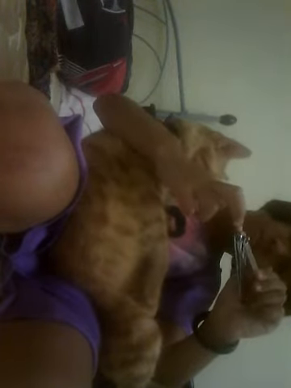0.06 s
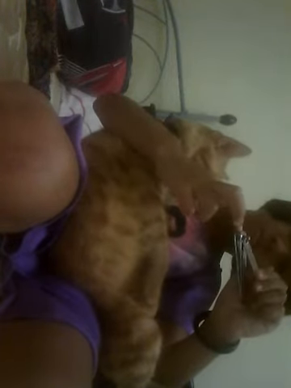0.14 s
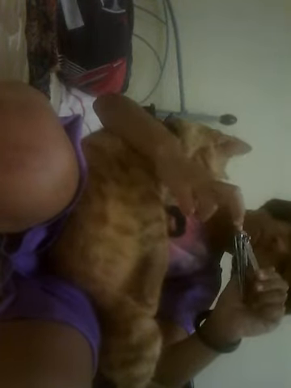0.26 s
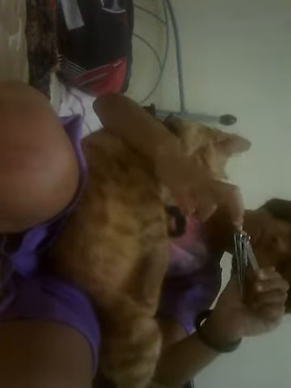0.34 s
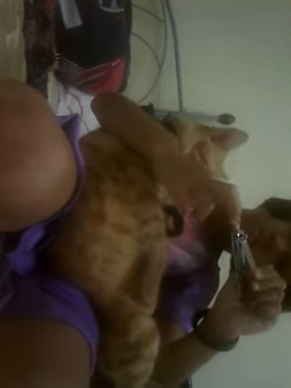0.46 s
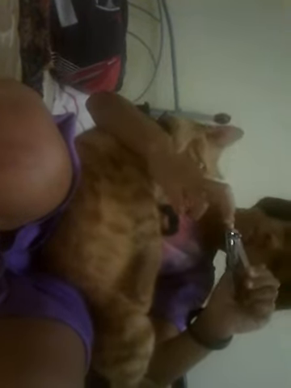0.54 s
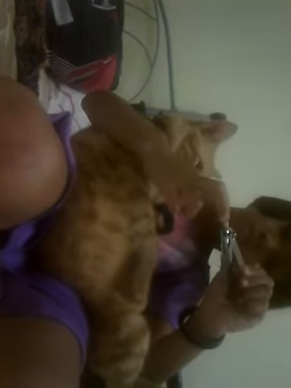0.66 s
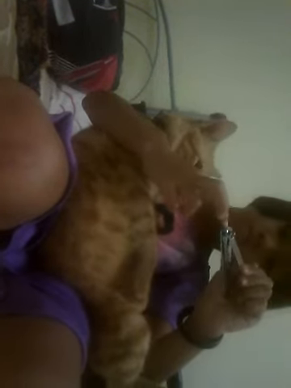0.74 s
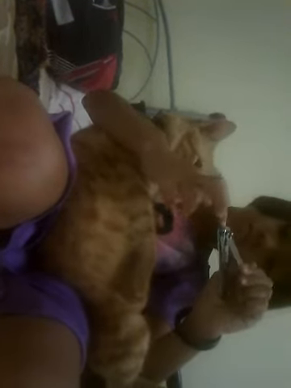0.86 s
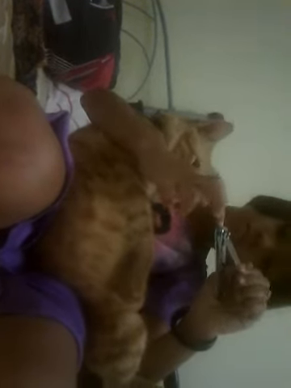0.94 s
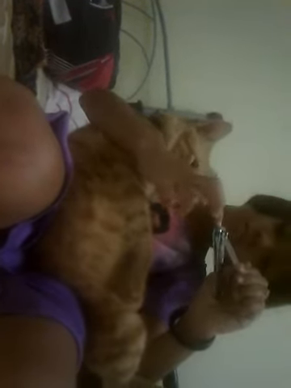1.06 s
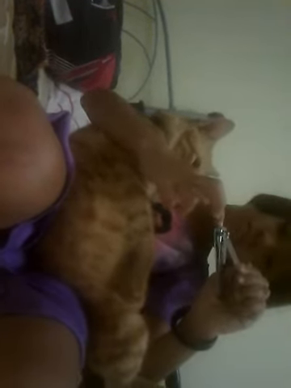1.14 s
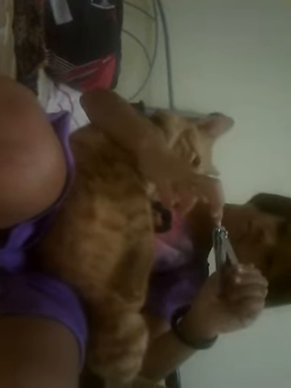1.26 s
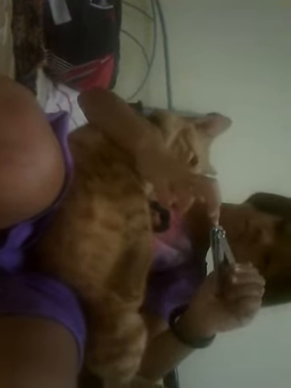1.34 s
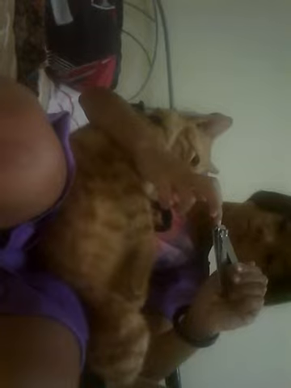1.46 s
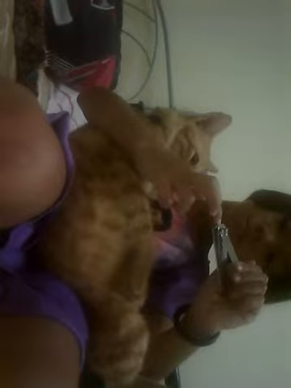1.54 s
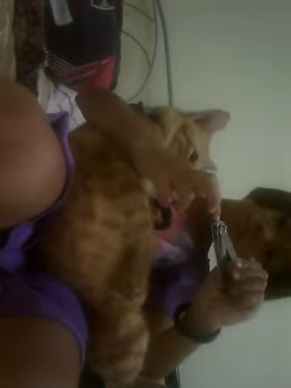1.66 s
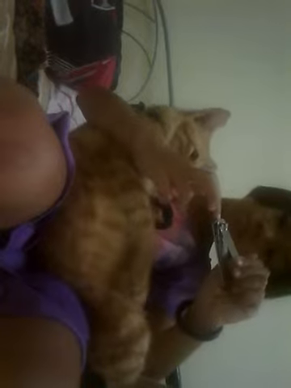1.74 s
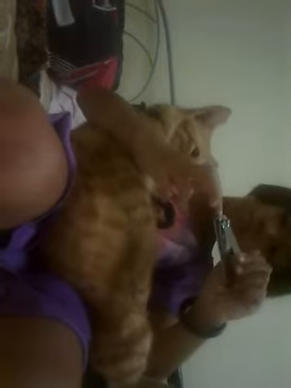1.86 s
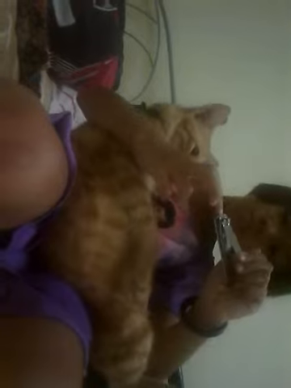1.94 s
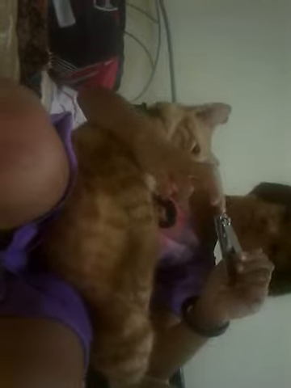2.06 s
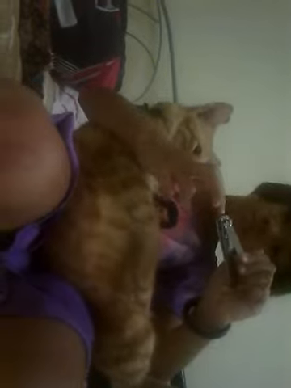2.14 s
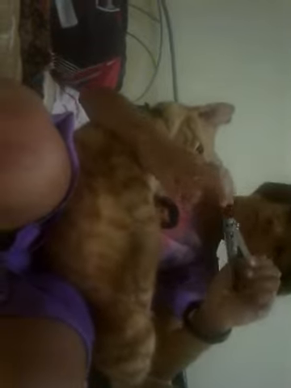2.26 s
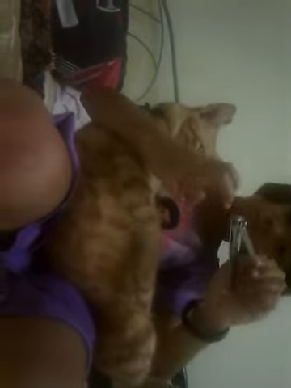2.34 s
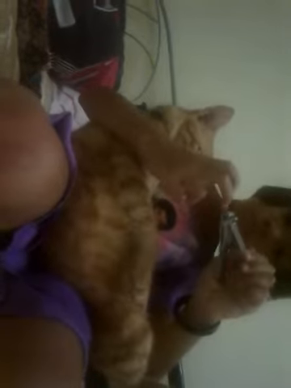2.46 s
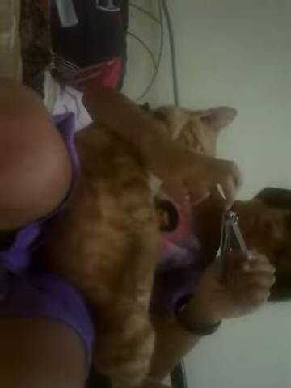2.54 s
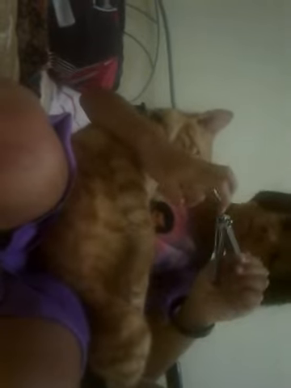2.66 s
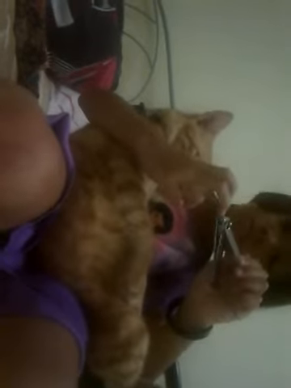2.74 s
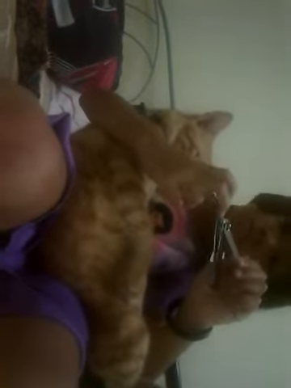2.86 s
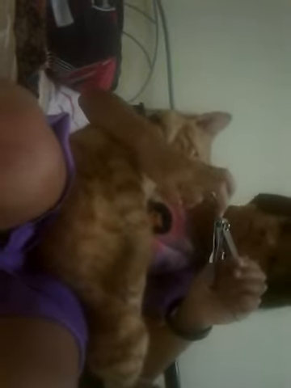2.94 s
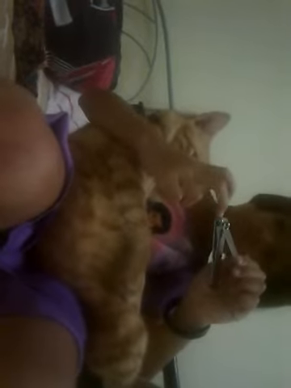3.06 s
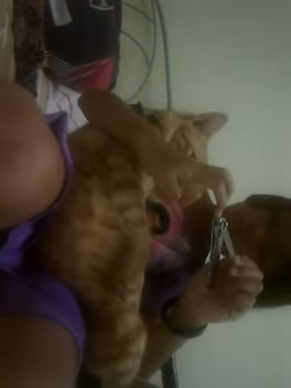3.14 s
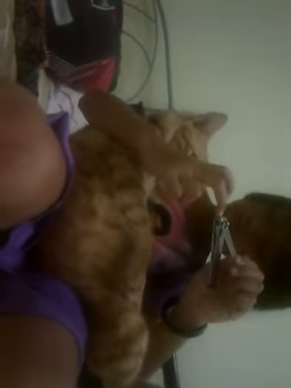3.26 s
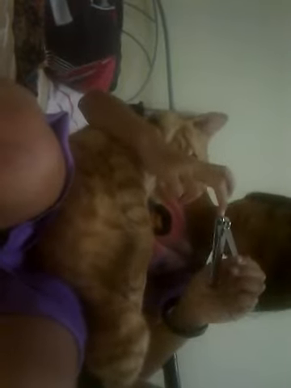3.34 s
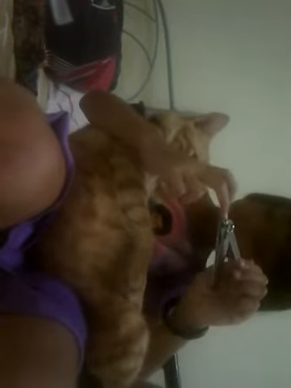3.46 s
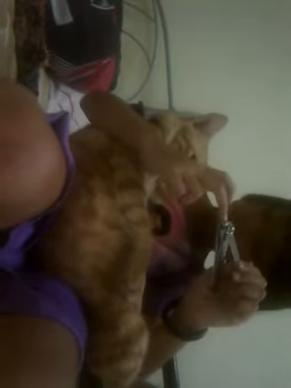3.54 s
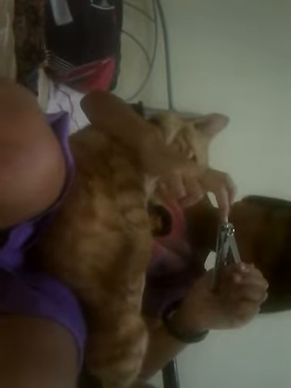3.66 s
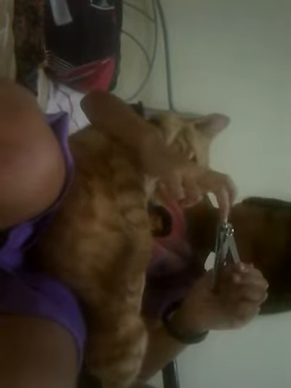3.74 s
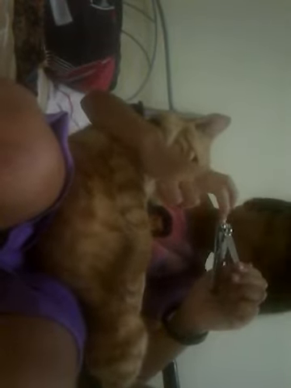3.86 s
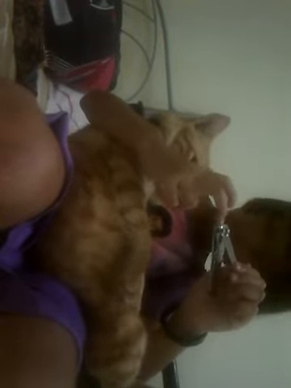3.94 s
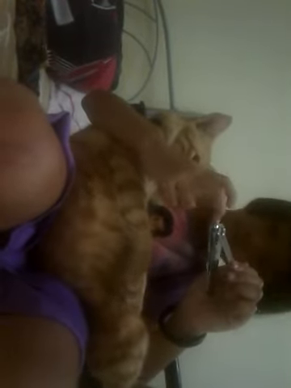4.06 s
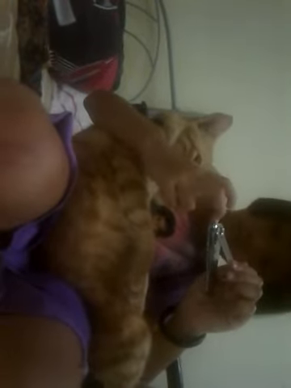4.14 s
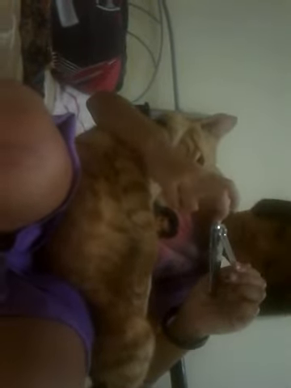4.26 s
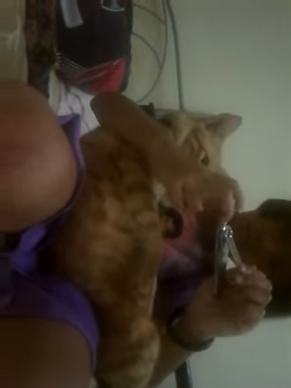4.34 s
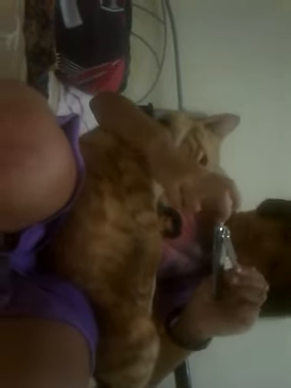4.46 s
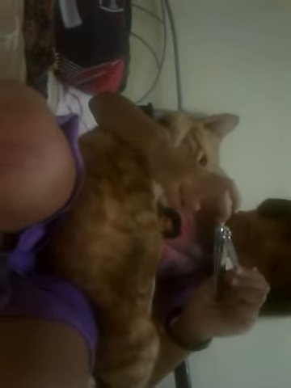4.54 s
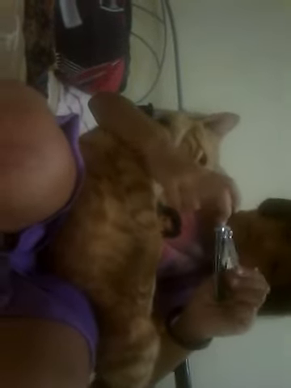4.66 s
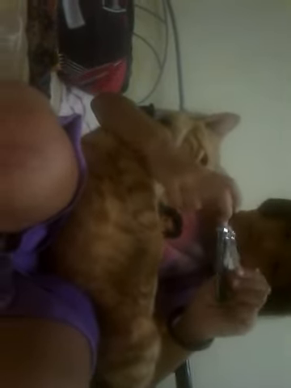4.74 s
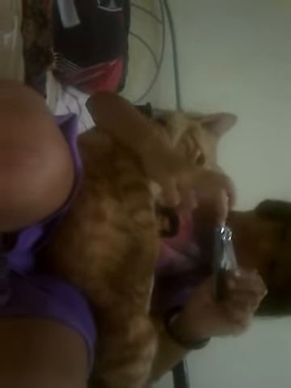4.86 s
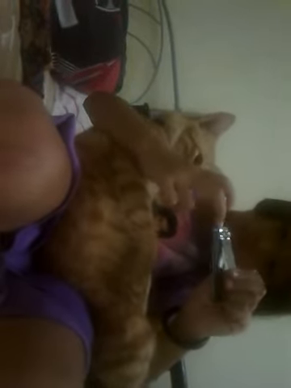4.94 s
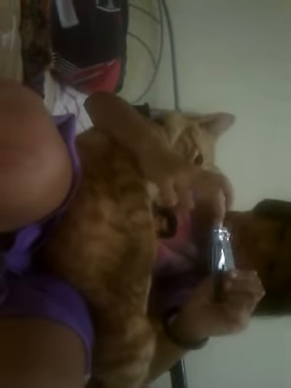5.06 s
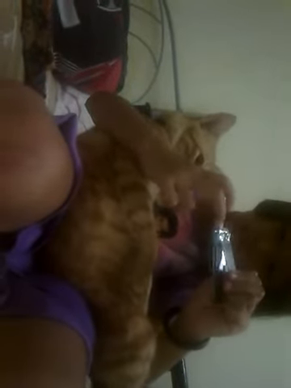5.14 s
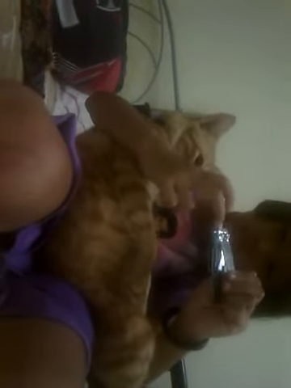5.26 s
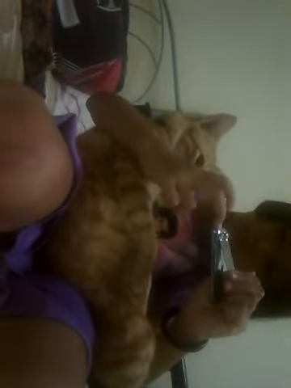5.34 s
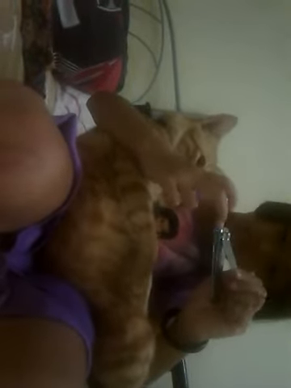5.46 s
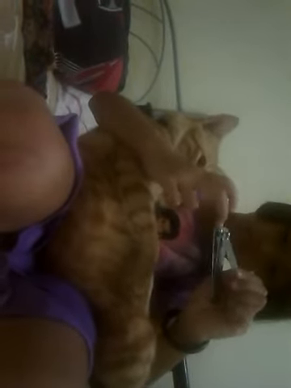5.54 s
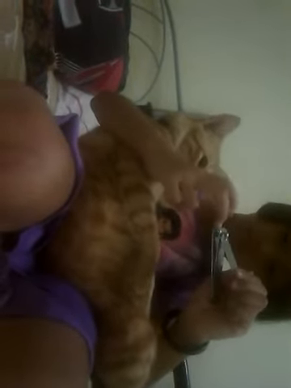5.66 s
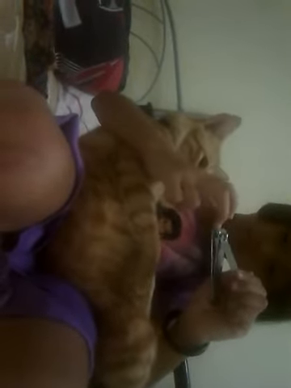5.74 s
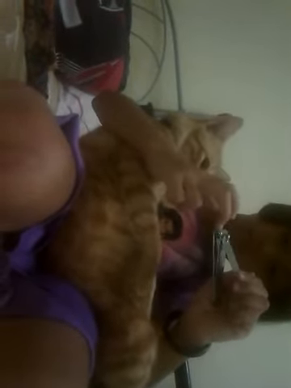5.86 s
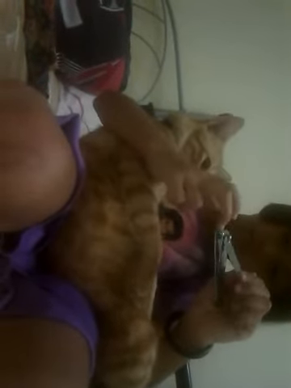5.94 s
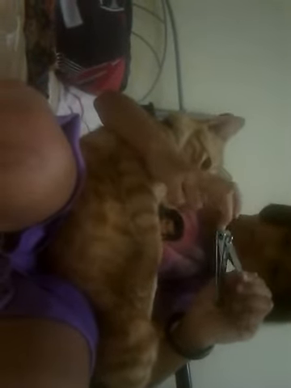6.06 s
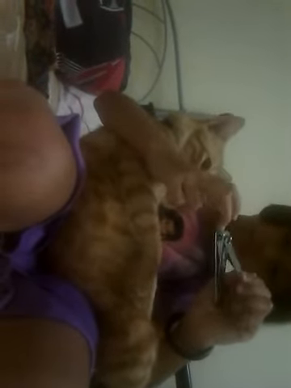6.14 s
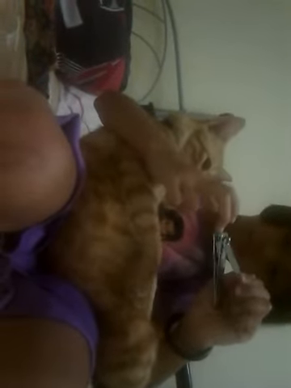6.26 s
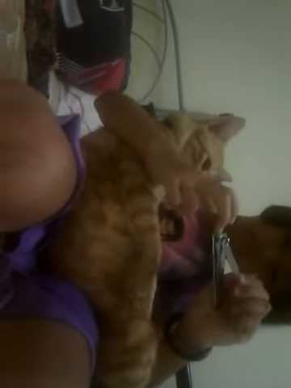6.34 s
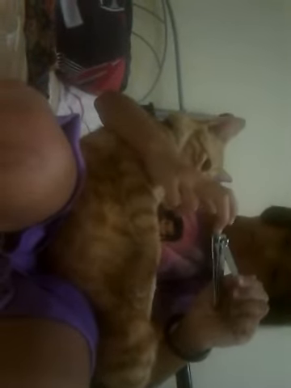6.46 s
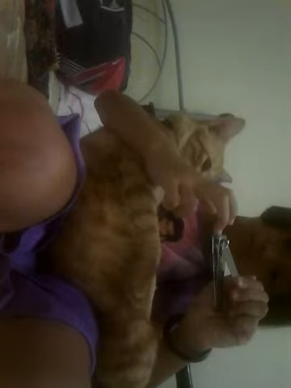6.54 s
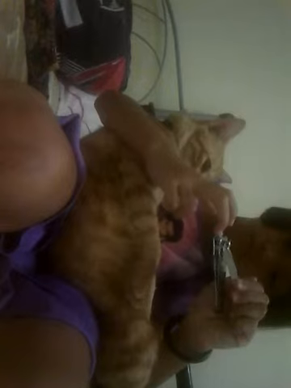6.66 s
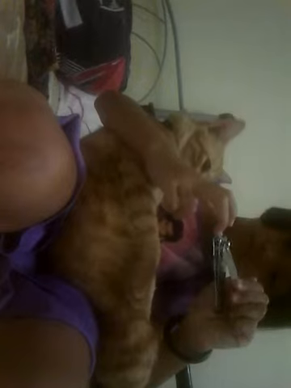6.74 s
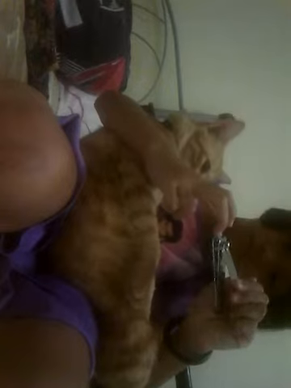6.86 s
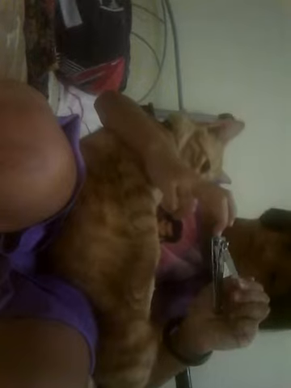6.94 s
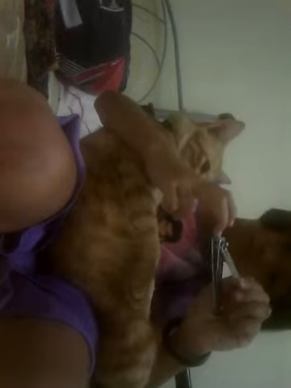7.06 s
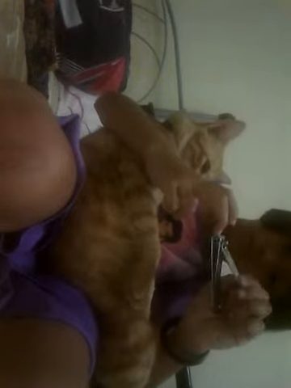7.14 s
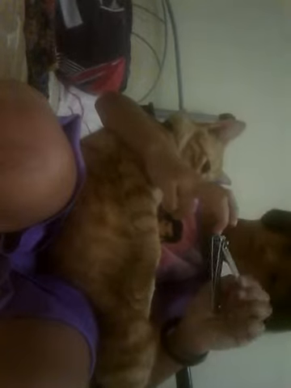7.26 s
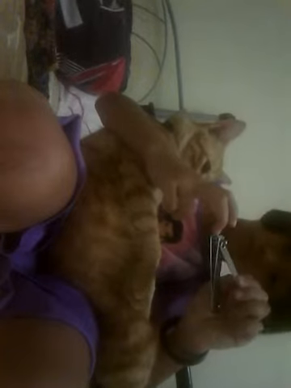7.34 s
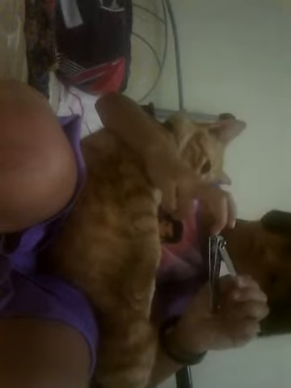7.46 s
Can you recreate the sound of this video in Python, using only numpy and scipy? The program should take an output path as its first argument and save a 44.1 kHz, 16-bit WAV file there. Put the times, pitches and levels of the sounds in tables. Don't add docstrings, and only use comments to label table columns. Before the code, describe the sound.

A nail clipper cuts a cat's claws about a metre from a phone. Faint metallic ticks and brushing fur come first, then a bright snap with quick clattering rebounds. After a quieter stretch, rustles and low bumps build to a second, stronger snap, followed by rattling metal and faint hinge squeaks. Short room echoes are chopped off as the fan's low hum fades in and out.

```python
import sys
import numpy as np
from scipy import signal
from scipy.fft import rfft, irfft
from scipy.io import wavfile
from scipy.ndimage import uniform_filter1d

SR = 44100
rng = np.random.default_rng(int(sys.argv[2]) if len(sys.argv) > 2 else 0)


def store_pcm(level_fs):
    pcm = np.round(np.clip(level_fs, -1, 1) * 32767).astype(np.int16)
    wavfile.write(sys.argv[1], SR, np.atleast_2d(pcm).T)


def volts_from_db(level):
    exponent = np.asarray(level, float) / 20
    return 10 ** exponent


N = 330436
STEP = 32
OPEN_DB = -57.5

# freq_hz, width_hz, level_db
LEVER_MODES = [
    [(2490, 140, 3.5), (3050, 91, -7), (4300, 1760, -5)],
    [(7225, 550, 3), (8500, 1000, 2.5), (9640, 1600, -2), (6160, 1000, -11)],
    [(13250, 600, 2), (12000, 1200, -10), (14400, 1400, -10), (11080, 780, -9), (16000, 2000, -22)],
]
# freq_hz, level_db (per Hz)
RATTLE_ROOM = [(1760, -40.5), (3000, -15.5), (3960, -18.5), (6040, -15.5), (6960, 0), (7690, -5),
               (8750, 0.5), (9900, -5), (11400, -16.5), (12300, -0.5), (13300, 2), (14100, -1.5),
               (16000, -21.5), (16500, -43)]


def ring(x, hz, width_hz):
    r = np.exp(-np.pi * width_hz / SR)
    pole = r * np.exp(2j * np.pi * hz / SR)
    return 2 * (1 - r) ** 2 * signal.lfilter([1], [1, -2 * pole, pole * pole], x).real


def body(x, modes):
    return sum((-1) ** k * volts_from_db(db) * ring(x, hz, width_hz) for k, (hz, width_hz, db) in enumerate(modes))


def unit(x):
    return x / np.sqrt(np.mean(x ** 2))


def colour(x, points):
    hz = np.maximum(np.arange(len(x) // 2 + 1) * SR / len(x), 1)
    points_hz, points_db = np.array(points).T
    gain_db = np.interp(np.log(hz), np.log(points_hz), points_db)
    return irfft(rfft(x) * volts_from_db(gain_db), len(x))


def walk(rate_hz):
    k = int(SR / rate_hz)
    held = np.repeat(rng.standard_normal(N // k + 1), k)
    return 1.3 * uniform_filter1d(uniform_filter1d(held, k), k)[:N]


def clock():
    return np.arange(0, N, STEP) / SR


def smooth(control):
    return np.interp(np.arange(N) / SR, clock(), control)


def room(wash, rings, gap_s, rise_s, size=SR // 3):
    # delay_s, level_db (over the diffuse sound)
    echoes = [(.005, 5.5), (0.0113, 3), (.0165, 7.5), (.0185, 7), (0.026, 8)]
    t60_low_s, t60_high_s, t60_top_s = 0.42, 0.4, 0.3
    t = np.arange(size) / SR
    clumps = np.repeat(rng.uniform(-1.6, 1, size // 50 + 1), 50)[:size]
    noise = rng.standard_normal(size) * volts_from_db(6.0 * clumps * np.exp(-t / 0.072))
    for delay_s, db in echoes:
        noise[int(delay_s * SR)] += volts_from_db(db) * 3
    ringing = sum(volts_from_db(db) * unit(ring(noise, hz, width_hz)) for hz, width_hz, db in rings)
    noise = unit(colour(noise, wash)) + ringing
    low = signal.sosfilt(signal.butter(2, 6000, fs=SR, output="sos"), noise)
    top = noise - signal.sosfiltfilt(signal.butter(6, 14300, fs=SR, output="sos"), noise)
    high = noise - low - top
    tail = low * volts_from_db(-60 * t / t60_low_s) + high * volts_from_db(-60 * t / t60_high_s) + top * volts_from_db(-60 * t / t60_top_s)
    return tail * np.clip((t - gap_s) / rise_s, 0, 1)


def strikes(blows, groups, contact_s, wash, start=(0.0017, 0.009), rings=()):
    pad = SR // 3
    direct, wet = np.zeros(N + 2 * pad), np.zeros(N + 2 * pad)
    for s, db, low_db, top_db, room_db in blows:
        push = 0.086 * np.exp(-np.arange(900) / (contact_s * SR)) * rng.standard_normal(900)
        push[0] = 1
        i = pad + int((s - 0.0002) * SR)
        for group_db, modes in zip((low_db, 0, top_db), groups):
            part = body(push, modes)
            direct[i:i + len(push)] += volts_from_db(db + group_db) * part / np.abs(part).max()
        if room_db is not None:
            wet[i:i + pad] += volts_from_db(db + room_db) * room(wash, rings, *start)
    return np.array([direct, wet])[:, pad:pad + N]


def snips():
    # start_s, peak_db, low_modes_db, top_modes_db, room_db (None = dry)
    cuts = [
        (2.1252, -5.5, -18.5, -17, -21.5),
        (5.2616, -2, -16.5, -10.5, -29),
    ]
    returns = [
        [(2.1402, -27.5, -18.5, -6.5, None), (2.1432, -24.5, -16.5, -4, None), (2.1518, -22, -15.5, -4, None)],
        [(5.277, -28.5, -15, -8, None), (5.2888, -26.5, -14.5, -3, None)],
    ]
    # freq_hz, width_hz, level_db
    jaws = [
        [[(4150, 270, 4), (3300, 1100, -13), (5550, 810, -13), (1199, 1600, -26)], [(8400, 930, 0.5),
         (6730, 900, -19.5), (9300, 990, -7)], [(10200, 500, 0), (11500, 1400, -2), (13800, 820, -8),
         (15700, 1200, -12)]],
        [[(4070, 370, 0), (3460, 970, -12.5), (2201, 1400, -28), (900, 900, -33)], [(8450, 570, 3.5),
         (6410, 600, -34), (9620, 570, -15.5)], [(11780, 910, 2.5), (13000, 1300, -1.5), (15570, 1000, -14)]],
    ]
    # freq_hz, level_db (per Hz)
    washes = [
        [(1180, -62.5), (2000, -35.5), (2630, -33), (4090, -9.5), (5100, -27), (5620, -18), (6250, -20.5),
         (8580, -0.5), (10200, -3.5), (13500, -19.5), (14700, -14.5), (16100, -29.5), (16500, -54)],
        [(1180, -57.5), (2000, -27.5), (3300, -20), (4050, -6.5), (4750, -27), (5420, -17), (6760, -22.5),
         (8210, 1), (8740, 0.5), (9890, -11.5), (13200, -1.5), (16100, -20.5), (16500, -43)],
    ]
    return sum(strikes([cut] + back, jaw, 0.001, wash, start=(0.004, 0.014))
               for cut, back, jaw, wash in zip(cuts, returns, jaws, washes))


def lever():
    # start_s, peak_db, low_modes_db, top_modes_db, room_db (None = dry)
    rebounds = [
        (2.1891, -15.5, -18.5, -2.5, -19.5),
        (2.1968, -19.5, -29, 0, -20),
        (2.2165, -19, -13, 0, -17.5),
        (2.2215, -25, -19, 1, -15),
    ]
    release = [
        (5.3955, -24, -30, 2.5, -7.5),
    ]
    rattles = [(5.6051, -40, -33, 0, None), (5.6063, -35, -28, -6, -17), (5.6081, -36, -28, -12, None),
               (5.6125, -42, -25, 0, None), (5.6205, -40, -25, 3, -20), (6.3362, -40.5, -22, -1.5, -9),
               (6.342, -46, -21, -4, -14), (6.3531, -37.5, -22, 2.5, -11), (6.4191, -36, -22, -4, -9),
               (6.4271, -46, -22, -8, None), (6.4403, -40, -19, -2, -14), (6.458, -43, -22, -2, None),
               (6.462, -45, -22, -5, None), (6.4795, -42, -22, -8, None), (6.6678, -32, -24.5, 0, -9),
               (6.6785, -39, -20, -13, None), (6.6845, -35, -21, -8, -8), (.0004, -38, -22, 0, None),
               (.004, -36, -16, -4, None), (.0077, -33, -25, -6, -14)]
    earlier = [
        (-0.022, -42, -17.5, 1.2, -6),
    ]
    # freq_hz, level_db (per Hz)
    rebound_wash = [(1180, -62.5), (2000, -35), (2490, -20), (2750, -28), (4050, -29), (5980, -19),
                    (7010, -6), (8360, -5), (9890, -6), (11400, -20), (13300, 4), (15600, -23),
                    (16100, -25), (16500, -55.5)]
    release_wash = [(1180, -63), (2000, -39), (2560, -26), (2850, -33), (3050, -22), (3500, -33),
                    (5200, -18.5), (6650, -13), (8400, 2), (11500, -11), (12600, -3.5), (13300, 4),
                    (16100, -21), (16500, -46)]
    # freq_hz, width_hz, level_db (against the wash)
    ringing = [(13030, 420, -14.5), (7140, 130, -20), (8390, 250, -22)]
    kinds = ((rebounds, rebound_wash), (release, release_wash), (rattles + earlier, RATTLE_ROOM))
    return sum(strikes(blows, LEVER_MODES, 0.0012, wash, rings=ringing) for blows, wash in kinds)


def ticks():
    # start_s, peak_db, low_modes_db, top_modes_db, room_db (None = dry)
    touches = [(0.1836, -46, -17, -11, -20), (0.4554, -45, -31, -3, -26), (.461, -48, -25, -6, None),
               (0.6594, -57, -2, -13, None), (0.8794, -62, -15, -15, None), (2.59, -62, -15, -19, None),
               (4.2768, -49.5, -9, -12, -32), (4.3824, -44, -10, -15, -24), (4.4694, -46, -14, -17, -24),
               (4.8894, -56, -3, -20, -24), (5.2284, -48, -9, -4, -15.5), (5.5854, -54, -8, -3, -8),
               (5.579, -60, -1, -20, None), (5.025, -64, 3, -20, None), (6.6645, -46, -20, -1, -8),
               (6.9347, -56, -18.5, -19.5, None), (7.2485, -49, -23.5, -15, -28),
               (7.2894, -58, -16, -21, None), (6.104, -59.5, 0, -14, None), (6.195, -66, 4.5, -14, None),
               (6.278, -71, 4, -14, None), (3.05, -60, -15, -8, None), (2.934, -60, -18, -5, None)]
    # freq_hz, width_hz, level_db
    dull_modes = [(1950, 500, 0), (3300, 900, -1.5), (4400, 1500, -5)]
    return strikes(touches, [dull_modes] + LEVER_MODES[1:], 0.0022, RATTLE_ROOM)


def knock():
    # start_s, peak_db, low_modes_db, top_modes_db, room_db (None = dry)
    bounces = [
        (7.3885, -48, -6, -21, -3),
        (7.3905, -39, -8, -23, -7),
        (7.399, -43, -6, -21, -6),
        (7.41, -41, -6, -21, -7),
        (7.4215, -43, -8, -21, -11),
        (7.4275, -42, -8, -21, None),
    ]
    # freq_hz, width_hz, level_db
    handle = [
        [(5100, 1800, 6), (3290, 1850, -9), (1900, 1100, -3)],
        [(6160, 890, 6), (7400, 1500, -5), (8750, 1200, 2), (9540, 1000, -7.5)],
        [(11000, 1500, 2.5), (13500, 3000, -11)],
    ]
    # freq_hz, level_db (per Hz)
    wash = [(880, -36), (1500, -14.5), (2220, -16), (2480, -11.5), (3180, -12), (4660, -2), (9130, -3),
            (11300, -21), (15200, -38), (16000, -34), (16500, -58)]
    # freq_hz, width_hz, level_db (against the wash)
    ringing = [(6600, 60, -10), (4840, 180, -15), (6250, 83, -12)]
    return strikes(bounces, handle, 0.0063, wash, start=(0, 0.006), rings=ringing)


def squeaks():
    # start_s, length_s, pitch_hz, width_hz, level_db
    slips = [(0.502, .065, 3900, 350, -79), (.455, 0.011, 1390, 380, -65), (1.598, .045, 4740, 55, -79),
             (1.577, 0.022, 5000, 80, -86), (1.797, .035, 4260, 50, -80), (1.868, .025, 3620, 90, -80),
             (1.998, 0.037, 4670, 70, -82), (2.015, .06, 5000, 55, -80), (2.448, 0.014, 2270, 200, -77),
             (3.52, .06, 3350, 130, -78), (3.46, .03, 3300, 160, -83), (3.526, 0.041, 7400, 300, -73),
             (3.585, .02, 4850, 200, -79), (3.641, 0.031, 1460, 200, -74), (3.83, 0.025, 4400, 250, -78),
             (3.866, .04, 4300, 300, -81), (5.398, 0.072, 3060, 70, -62), (5.43, .04, 2580, 70, -65),
             (5.835, .095, 4500, 1100, -75), (5.7, .08, 5900, 1200, -72), (5.73, 0.044, 7800, 300, -76),
             (6.185, .025, 1800, 1100, -72), (6.21, .1, 1400, 1100, -79), (6.195, 0.1, 8800, 1600, -73),
             (6.08, .09, 3900, 1200, -78), (4.22, .12, 5000, 1200, -72), (4.23, .11, 3200, 900, -76),
             (2.65, .05, 5900, 700, -76)]
    out = np.zeros(N)
    for s, length_s, hz, width_hz, db in slips:
        swell = np.sqrt(np.hanning(int(1.5 * length_s * SR))) * volts_from_db(-1.5)
        size = len(swell)
        i = int((s - 0.2 * length_s) * SR)
        roughness = np.repeat(rng.standard_normal(size // 300 + 1), 300)[:size]
        note = ring(rng.standard_normal(SR // 4), hz, width_hz)[-size:] * volts_from_db(2.2 * roughness)
        out[i:i + size] += volts_from_db(db) * swell * unit(note)
    return out


def strokes():
    # peak_s, level_db, swell_s, fade_s, dull_part_db
    rubs = [(.186, -68, .008, .01, -15), (.39, -77, 0.43, 0.35, -9), (0.461, -59.5, 0.0051, .016, -6),
            (.54, -86, 0.063, .05, 6.5), (.69, -69, 0.069, 0.33, -5), (.87, -69, 0.016, 0.033, -8),
            (1.12, -76, 0.13, .3, -7), (1.504, -62, 0.062, 0.066, -12), (1.62, -83, 0.087, 0.089, 3),
            (1.92, -65, 0.12, 0.08, -20), (2.039, -83, 0.093, 0.14, 5), (2.764, -69, 0.14, 0.2, 8),
            (3.03, -76.5, .25, 0.48, -7), (3.381, -63.5, 0.034, .12, -13), (3.55, -68.5, .11, 0.09, -8.5),
            (3.62, -67.5, 0.05, 0.086, -8), (4.285, -67, 0.14, 0.15, -4.5),
            (4.395, -51.5, 0.058, 0.053, -17), (4.5, -59, 0.12, 0.075, -25), (4.64, -65, .06, 0.055, -15),
            (4.955, -63.5, 0.06, 0.074, -14), (5.22, -55.5, 0.12, 0.077, -18),
            (5.7, -74.5, 0.065, 0.29, -1), (6.92, -61, 0.046, 0.066, -21),
            (5.2, -87, 0.086, .1, 9), (4.9, -65.5, 0.019, 0.027, -6.5), (2.865, -72, 0.14, 0.05, 5),
                   (4.83, -72.5, 0.12, .2, -19), (5.2, -56, 0.061, .03, -9), (2.5, -77.5, .1, 0.15, -2),
                   (5.5, -83, .2, 0.19, -2), (6.1, -79, .02, .06, -8), (5.4, -73, 0.38, 0.087, 0),
                   (6.56, -75, 0.054, 0.47, -9), (10, -66, 0.036, 0.12, -3), (7.2, -80, 0.45, .2, -20),
                   (7.25, -65, .008, 0.026, -8), (7.37, -67, 0.066, 0.099, -21),
                   (3.84, -80, .08, 0.079, -3)]
    range_db = 16
    t, power = clock(), 1e-12
    for s, db, swell_s, fade_s, dull_db in rubs:
        away = np.maximum((s - t) / max(swell_s, 0.004), (t - s) / max(fade_s, 0.004))
        level_db = db - range_db * np.minimum(away, 9) + np.array([[0], [dull_db]])
        power = power + volts_from_db(2 * level_db)
    return np.sqrt(power)


def grains():
    bursts = np.repeat(rng.exponential(size=N // 30 + 1), 30)[:N]
    return rng.standard_normal(N) * volts_from_db(2.2 * bursts + 2.0 * walk(40))


def rustle(rubbing):
    # freq_hz, width_hz, level_db
    fur = [(8940, 2100, 3), (6940, 480, -2), (12165, 6100, -11.5)]
    cloth = [(5400, 2600, 0), (3400, 1200, -18), (1470, 860, -5.5)]
    return sum(smooth(gain) * unit(body(grains(), modes)) for gain, modes in zip(rubbing, (fur, cloth)))


def thumps():
    # start_s, length_s, level_db
    bumps = [
        (.66, 0.24, -67),
        (4.368, 0.12, -60),
        (4.461, 0.098, -61),
        (4.881, 0.14, -68.5),
    ]
    thump_hz, thump_width_hz = 166, 180
    out = np.zeros(N)
    for s, length_s, db in bumps:
        u = np.linspace(0, 1, int(length_s * SR))
        i = int(s * SR)
        note = unit(ring(rng.standard_normal(len(u)), thump_hz, thump_width_hz))
        out[i:i + len(u)] += volts_from_db(db) * np.sin(np.pi * np.sqrt(u)) * note
    return out


def fan():
    # freq_hz, level_db (per Hz)
    air_colour = [(12, -31.5), (20, -7.5), (27, -21), (100, -11), (160, -7), (273, -6), (297, -1.5),
                  (342, -8), (372, -9), (652, -13.5), (729, -13.5), (1650, -25), (9150, -26),
                  (15200, -32.5), (16500, -47)]
    hz = np.arange(N // 2 + 1) * SR / N
    spectrum = rfft(colour(rng.standard_normal(N), air_colour)) * np.minimum(hz / 80, 1) ** 2
    bass = irfft(spectrum * (hz < 900), N)
    air = irfft(spectrum * (hz >= 900), N) / bass.std()
    hum = unit(ring(rng.standard_normal(N), 297, 7.8))
    return unit(bass) * volts_from_db(0.49 * walk(30)), air, hum


def gate_level(rubbing):
    # start_s, stay_s, fan_level_db
    openings = [(-.02, 0.058, -58), (.03, .025, -62), (.05, .045, -67), (.176, .015, -66.5),
                (.25, 0.025, -69.5), (.452, .014, -67), (.665, 0.029, -64), (2.124, 0.26, -56),
                (2.586, 0.0078, -64), (2.7, 0.14, -65), (1.05, 0.11, -69.5), (1.88, 0.048, -64.5),
                (6.9, 0.037, -65.5), (2.992, 0.0072, -65.5), (3.135, 0.016, -67), (3.82, 0.031, -71),
                (4.378, 0.039, -49), (4.43, 0.051, -58), (4.49, 0.03, -57.5), (5.262, .255, -56),
                (5.499, 0.041, -60.5), (5.584, .02, -62), (5.602, 0.046, -55), (5.645, .013, -57.5),
                (5.655, .02, -61), (5.855, 0.01, -67), (6.19, 0.032, -69), (6.098, .014, -67.5),
                (6.335, 0.16, -57), (6.49, .045, -62), (6.664, .125, -58), (6.78, .027, -60),
                (7.246, 0.016, -66.5), (7.386, 0.102, -57.5)]
    shut_db, rise_s, snap_db, close_db_per_s = -73.5, 0.0048, 6.5, 106
    lift, lift_full_db, lift_s = 0.89, -55, 0.02
    waver_db, waver_hz = 0.85, 26
    t = clock()
    rub_power = uniform_filter1d(np.sum(rubbing ** 2, axis=0), size=int(lift_s * SR / STEP))
    heard_db = 10 * np.log10(rub_power + 1e-12)
    lifted_db = OPEN_DB + lift * np.minimum(heard_db - lift_full_db, 0)
    power = volts_from_db(2 * shut_db) + volts_from_db(2 * lifted_db)
    power = power * volts_from_db(2 * waver_db * walk(waver_hz)[::STEP])
    for s, stay_s, db in openings:
        after_s = np.maximum(t - s - stay_s, 0)
        fall_db = snap_db * np.minimum(after_s / rise_s, 1) + close_db_per_s * after_s
        power = np.maximum(power, volts_from_db(2 * (db - fall_db)) * np.clip((t - s) / rise_s, 0, 1))
    return smooth(10 * np.log10(power))


def scene():
    direct, wet = snips() + lever() + ticks() + knock()
    rubbing = strokes()
    handling = rustle(rubbing) + squeaks() + thumps()
    bass, air, hum = fan()
    rumble = volts_from_db(-91) * unit(ring(rng.standard_normal(N), 35.0, 50.0))
    gate_db = gate_level(rubbing)
    hum = hum * volts_from_db(-12 + np.minimum(gate_db, OPEN_DB + 6.0))
    fan_db = -60.5
    hiss = air * volts_from_db(fan_db + 0.98 * (gate_db - fan_db))
    tail_gain = volts_from_db(1.9 * np.minimum(gate_db - OPEN_DB, 0))
    return (direct + wet * tail_gain + bass * volts_from_db(gate_db) + hum + hiss + rumble + handling)[None]


def top_cut(x):
    return signal.sosfilt(signal.butter(12, 16830, fs=SR, output="sos"), x)


def record(dry):
    hz = np.arange(N // 2 + 1) * SR / N
    spectrum = rfft(dry)
    top, over = (irfft(spectrum * np.clip((hz - edge_hz) / 150, 0, 1), N) for edge_hz in (15800, 16650))
    quick, slow = (uniform_filter1d(np.abs(top), size=k) for k in (100, 2000))
    sudden = uniform_filter1d(1.0 * (quick > 3.4 * slow), size=200)
    mix = np.clip(dry - over - (top - over) * (1 - sudden), -1, 1)
    return top_cut(mix)


dry = scene()
out = record(dry)
store_pcm(out)
```